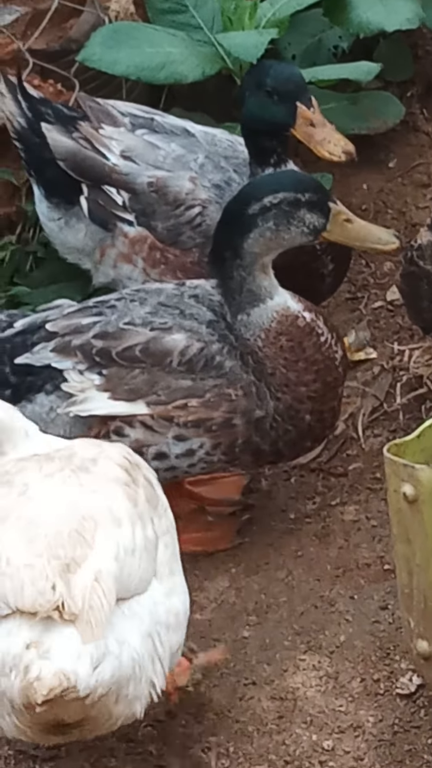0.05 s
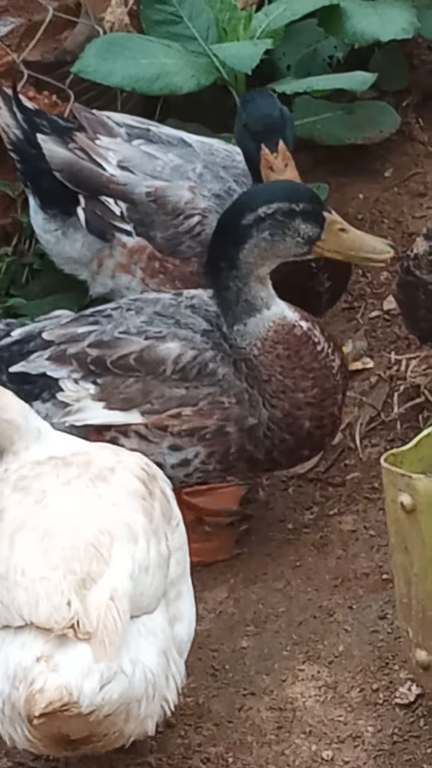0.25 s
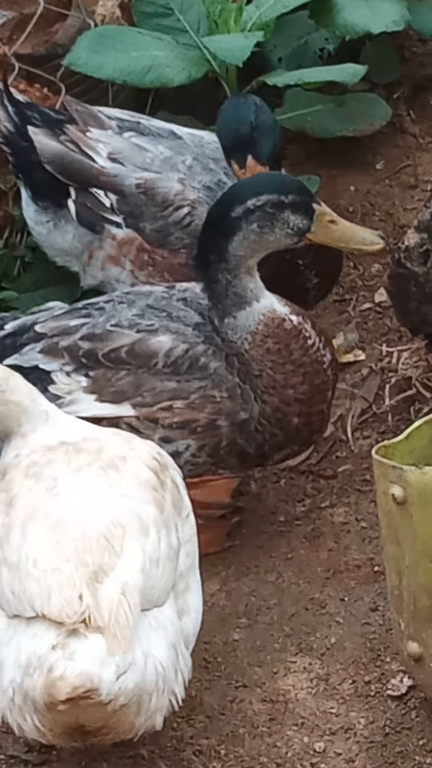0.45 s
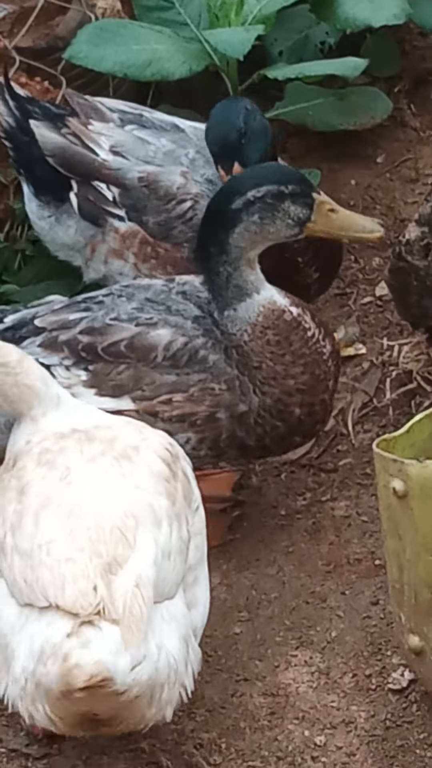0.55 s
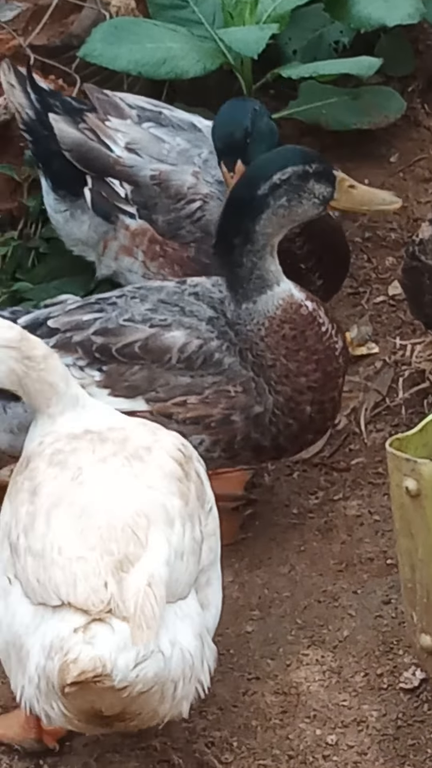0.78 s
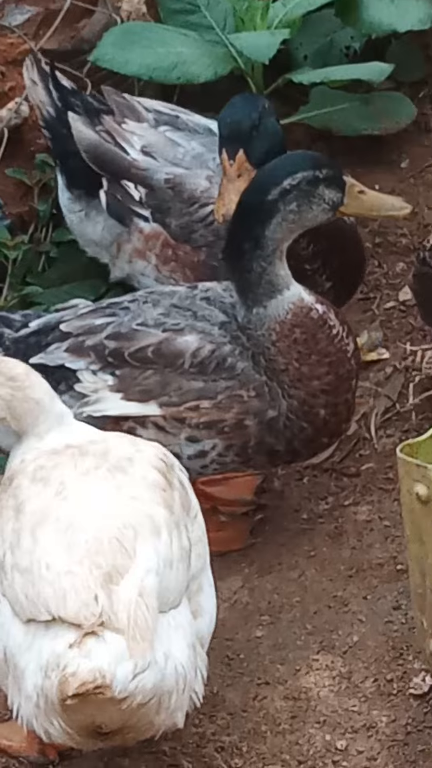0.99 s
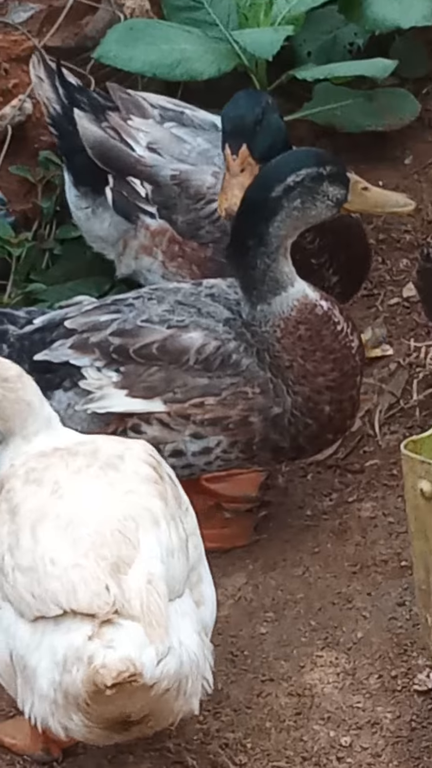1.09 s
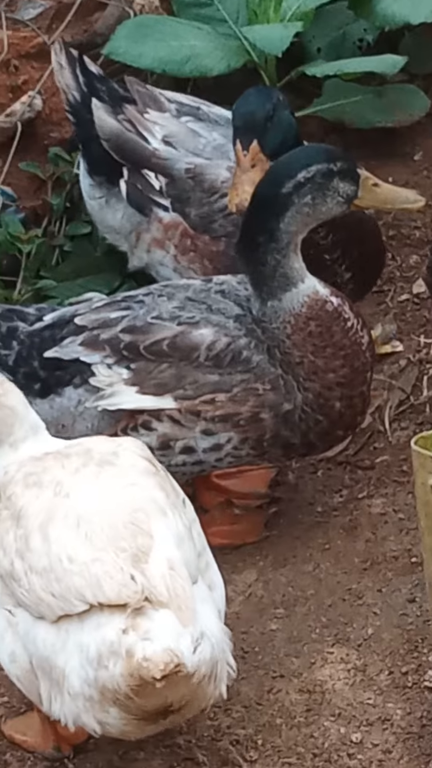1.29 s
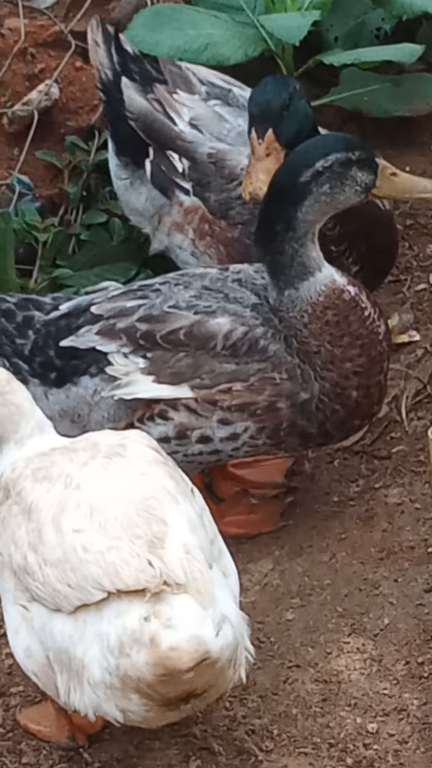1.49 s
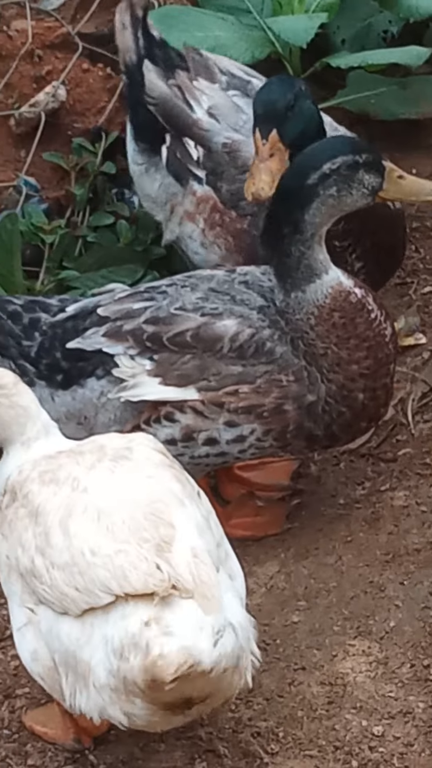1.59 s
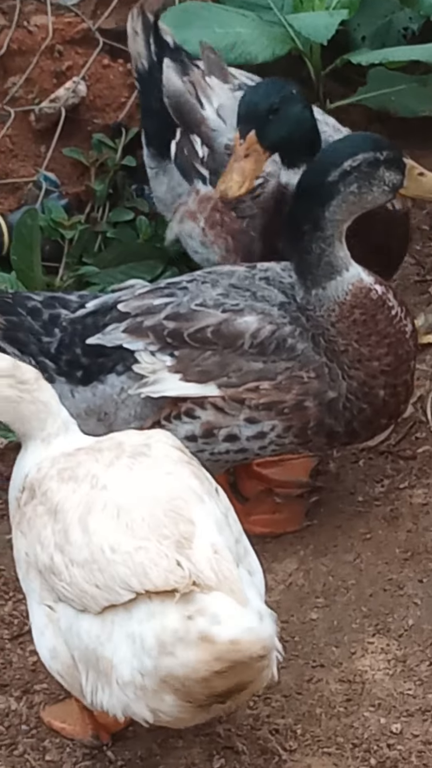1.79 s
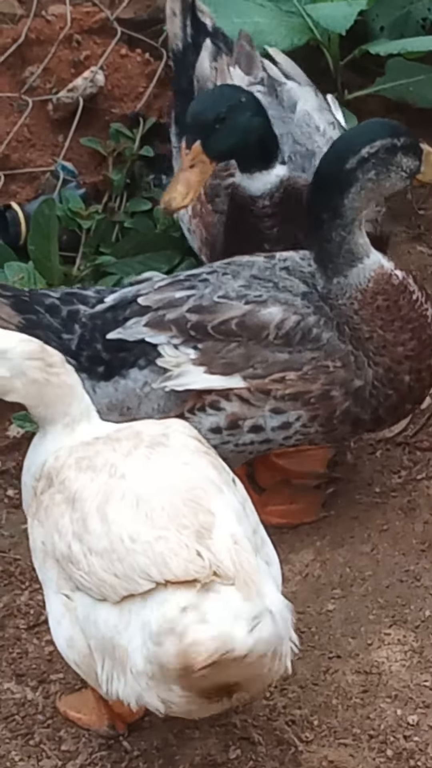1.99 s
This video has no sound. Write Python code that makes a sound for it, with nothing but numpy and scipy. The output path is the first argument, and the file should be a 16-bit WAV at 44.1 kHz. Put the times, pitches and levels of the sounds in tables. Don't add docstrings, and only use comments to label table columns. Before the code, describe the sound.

Several ducks give about ten short, raspy quacks in turn, differing in pitch and loudness, over soft foot taps on soil, faint cricket trills, outdoor hiss and a distant engine hum, picked up close by a phone.

```python
import sys
import numpy as np
from scipy import signal
from scipy.fft import rfft, irfft, next_fast_len
from scipy.io import wavfile
from scipy.ndimage import uniform_filter1d, map_coordinates

SR = 44100
rng = np.random.default_rng(int(sys.argv[2]) if len(sys.argv) > 2 else 0)


def gain_from_decibels(decibels):
    exponent = np.asarray(decibels, float) / 20
    return 10 ** exponent


def store_wav(level_fs):
    pcm = np.round(np.clip(np.atleast_2d(level_fs), -1, 1) * 32767)
    wavfile.write(sys.argv[1], SR, pcm.T.astype(np.int16))


N = 90404


def unit(x):
    return x / np.sqrt(np.mean(x ** 2) + 1e-20)


def along(points, hz):
    f, value = np.transpose(points)
    return np.interp(np.log(hz + 1), np.log(f + 1), value)


def wobble(rate_hz):
    knots = rng.standard_normal(int(N * 40 / SR) + 9)
    return map_coordinates(knots, [np.arange(N) * min(rate_hz, 39) / SR])


def filtered(x, response):
    size = next_fast_len(len(x) + 8192)
    return irfft(rfft(x, size) * response(np.fft.rfftfreq(size, 1 / SR)), size)[:len(x)]


def resonance(f, hz, width_hz):
    damping = 1j * f * width_hz
    return damping / (hz * hz - f * f + damping + 1e-9)


def resonant_noise(hz, width_hz):
    return unit(filtered(rng.standard_normal(N), lambda f: resonance(f, hz, width_hz) ** 2))


def add(out, start_s, x):
    i = round(start_s * SR)
    x = x[max(-i, 0):N - i]
    out[max(i, 0):][:len(x)] += x


def hiss(spectrum, patchy_db):
    z = signal.stft(rng.standard_normal(N), nperseg=512)[2]
    field = uniform_filter1d(rng.standard_normal(z.shape), 6, 0)
    field = uniform_filter1d(field, 10, 1)
    patches = gain_from_decibels(2 * patchy_db * np.tanh(unit(field) / 2))
    x = signal.istft(z * patches, nperseg=512)[1][:N]
    return unit(filtered(x, lambda hz: gain_from_decibels(along(spectrum, hz))))


# (frequency [Hz], density [dB per Hz])
AIR_SPECTRUM = [(20, -21), (55, 0.5), (200, -6), (500, -13.5), (1400, -3.5), (3500, -12.5), (7000, -18.5),
                (10200, -46)]
# (frequency [Hz], density [dB per Hz])
MICROPHONE_SPECTRUM = [(5590, -28), (9500, -6), (10500, -6.5), (12300, -11.5), (13500, -14.5), (14800, 3.5),
                       (15800, -0.5)]
# (time [s], level [dB])
AIR_LEVEL_CURVE = [(0, -62), (.15, -63), (0.699, -62), (1.3, -64.5), (1.75, -62.5), (1.85, -66),
                   (2.05, -62)]


def air():
    time_s, level_db = np.transpose(AIR_LEVEL_CURVE)
    outdoors = gain_from_decibels(np.interp(np.arange(N) / SR, time_s, level_db)) * hiss(AIR_SPECTRUM, patchy_db=1.9)
    return outdoors + gain_from_decibels(-85.5) * hiss(MICROPHONE_SPECTRUM, patchy_db=1.0)


# (frequency [Hz], width [Hz], level [dB])
INSECT_BANDS = [(4126, 470, -73), (7420, 400, -83)]


def far_insects():
    out = np.zeros(N)
    for hz, width_hz, level_db in INSECT_BANDS:
        out += gain_from_decibels(level_db + 1.1 * wobble(13)) * resonant_noise(hz, width_hz)
    return out


# (frequency [Hz], level [dB])
ENGINE_ENVELOPE = [(25, -35), (110, -23), (250, -10), (600, 5), (1000, 10.5), (1400, -6.5), (2200, 3),
                   (3400, -21.5)]
# (order [multiple of firing rate], level [dB rms])
STRONG_ORDERS = [(2, -78), (5, -66), (6, -72), (14, -83.5), (16, -75), (23, -84.5), (28, -71.5), (35, -83),
                 (39, -77.5), (43, -80.5), (51, -78.5), (52, -72.5), (53, -71.5), (55, -80.5)]


def engine():
    firing_hz, delay_s = 25.77, 0.011
    comb_db, scatter_db, wander_db = -70, 5, 2.95
    order = np.arange(1, 131)
    scatter, phase = rng.standard_normal((2, len(order)))
    level_db = along(ENGINE_ENVELOPE, order * firing_hz)
    total_db = 10 * np.log10(np.sum(gain_from_decibels(2 * level_db)))
    level_db = level_db + comb_db - total_db + scatter_db * scatter
    for k, strong_db in STRONG_ORDERS:
        level_db[round(k) - 1] = strong_db
    cycle = 2 * np.pi * firing_hz * (np.arange(N) / SR - delay_s)
    drift_db = [wander_db * wobble(5.19) for _ in range(5)]
    out = np.zeros(N)
    for k, db, turn in zip(order, level_db, phase):
        out += np.sqrt(2) * gain_from_decibels(db + drift_db[k % 5]) * np.sin(k * cycle + 1.16 * turn)
    return out


# (start [s], length [s], level [dB])
CRICKET_TRILLS = [
    (.009, .32, -67),
    (0.722, .28, -65.5),
    (1.388, .4, -69.5),
]


def cricket():
    wing_hz, width_hz, stroke_hz, sharpness = 8708, 280, 25.1, 1.2
    tone_share = 0.38
    gate = np.full(N, gain_from_decibels(-84.5))
    t = np.arange(SR // 2) / SR
    strokes = np.abs(np.sin(np.pi * stroke_hz * t)) ** (2 * sharpness)
    for start_s, length_s, level_db in CRICKET_TRILLS:
        whole_strokes = t < round(length_s * stroke_hz) / stroke_hz
        phrase_db = level_db - 15 * np.exp(-t / 0.033) - 5 * (t / length_s) ** 6
        add(gate, start_s, gain_from_decibels(phrase_db) * strokes * whole_strokes)
    scrape = resonant_noise(wing_hz, width_hz)
    tone = np.sqrt(2) * np.sin(2 * np.pi * wing_hz * np.arange(N) / SR)
    return gate * unit(scrape + tone_share * tone)


def yard(x):
    t60_s, first_echo_s = 0.14, .004
    t = np.arange(SR // 4) / SR
    tail = rng.standard_normal(len(t)) * gain_from_decibels(-60 * t / t60_s) * (t > first_echo_s)
    return signal.fftconvolve(x, tail / np.linalg.norm(tail))[:N]


# (start [s], level [dB], center [Hz], width [Hz], length [s])
FOOT_AND_BILL_TAPS = [
    (.005, -62.5, 2000, 170, 0.011),
    (.14, -64.5, 247, 110, .04),
    (0.12, -65, 570, 310, 0.042),
    (.245, -54.5, 880, 93, .018),
    (.735, -69, 221, 91, 0.033),
    (1.31, -61, 314, 440, 0.042),
    (1.308, -61, 2200, 1800, 0.0044),
    (.19, -67, 330, 170, 0.018),
    (1.308, -80.5, 16000, 2500, .025),
    (1.95, -84, 14500, 2600, .015),
]


def steps():
    out, t = np.zeros(N), np.arange(SR // 8) / SR
    for start_s, level_db, hz, width_hz, length_s in FOOT_AND_BILL_TAPS:
        burst = rng.standard_normal(len(t)) * (t / length_s) * np.exp(-4 * t / length_s)
        burst = filtered(burst, lambda f: resonance(f, hz, width_hz) ** 2)
        add(out, start_s, gain_from_decibels(level_db) * burst / np.sqrt(np.sum(burst ** 2) / (length_s * SR)))
    return out


def swell(t, length_s):
    attack_share, release_share, roundness = 0.43, 0.78, 1.97
    top_s = attack_share * length_s
    turn = np.where(t < top_s, t / top_s, 1 + (t - top_s) / (release_share * length_s))
    return np.abs(np.sin(np.pi / 2 * np.clip(turn, 0, 2))) ** roundness


def syrinx(t, rate_hz):
    jitter_share, scatter_db, sharpness, snap = .05, 2.5, 2.2, 12
    jitter, size = rng.standard_normal((2, 30))
    count = np.arange(len(size))
    flap_s = (count + np.clip(jitter_share * jitter, -.4, .4) - 1) / rate_hz
    cycle = np.interp(t, flap_s, count)
    puffs = np.abs(np.sin(np.pi * cycle)) ** (2 * sharpness)
    puffs = puffs * gain_from_decibels(scatter_db * size[cycle.astype(int)])
    middle = np.floor(cycle + .5)
    return puffs, snap * np.diff(middle, prepend=middle[0])


def duck(quacks, throat, rate_hz):
    main_width_hz, bright_from_hz, bill_top_hz = 94, 3500, 7560
    out, t = np.zeros(N), np.arange(SR // 5) / SR
    for start_s, length_s, level_db, main_hz, bright_db in quacks:
        puffs, snaps = syrinx(t, rate_hz)
        breath, call = rng.standard_normal(len(t)), np.zeros(len(t))
        for hz, width_hz, gain_db, lead_s in [(main_hz, main_width_hz, 0, 0)] + throat:
            opening = swell(t + lead_s, length_s)
            if hz > bright_from_hz:
                drive = breath * (puffs + .6) * opening ** 2.2
                gain_db = gain_db + bright_db
            else:
                drive = (breath + snaps) * (puffs + .17) * opening
            call += gain_from_decibels(gain_db) * filtered(drive, lambda f: resonance(f, hz, 1.5 * width_hz) ** 2)
        call = filtered(call, lambda f: 1 / np.sqrt(1 + (f / bill_top_hz) ** 16))
        add(out, start_s, gain_from_decibels(level_db) * call / np.sqrt(np.sum(call ** 2) / (length_s * SR)))
    return out


# (start [s], length [s], level [dB], main resonance [Hz], brightness [dB])
FAR_QUACKS = [
    (.184, 0.065, -47, 2280, 2),
    (1.067, 0.081, -48.5, 2223, -2),
]
# (frequency [Hz], width [Hz], level [dB], lead [s])
FAR_RESONANCES = [(1607, 100, -10.5, 0.0005), (1870, 110, -10, 0.016), (2900, 110, -17.5, 0.0074),
                  (5050, 66, -18, -0.00036), (5610, 130, -11, 0.012), (6030, 89, -12, 0.01)]


def far_drake():
    return duck(FAR_QUACKS, FAR_RESONANCES, rate_hz=82.4)


# (start [s], length [s], level [dB], main resonance [Hz], brightness [dB])
HOARSE_QUACKS = [
    (.478, 0.072, -52, 2263, -2),
    (1.346, 0.06, -48, 2206, -5.5),
]
# (frequency [Hz], width [Hz], level [dB], lead [s])
HOARSE_RESONANCES = [(1370, 53, -6.5, -0.015), (1667, 77, -5.5, -0.00092), (1930, 27, -6, 0.012),
                     (2813, 130, -8, 0.0092), (4490, 210, -17, 0.0079), (5260, 130, -9, -0.001),
                     (5700, 130, -10.5, -.003), (5910, 150, -5, 0.0062)]


def hoarse_duck():
    return duck(HOARSE_QUACKS, HOARSE_RESONANCES, rate_hz=89.4)


# (start [s], length [s], level [dB], main resonance [Hz], brightness [dB])
HIGH_QUACKS = [
    (.296, 0.08, -45.5, 2284, 1),
    (.549, 0.075, -44, 2290, -0.5),
]
# (frequency [Hz], width [Hz], level [dB], lead [s])
HIGH_RESONANCES = [(1393, 85, -12.5, 0.028), (1670, 110, -12.5, -0.017), (1866, 72, -7, -0.0054),
                   (2760, 88, -29.5, -0.034), (3850, 61, -19.5, -0.007), (4540, 64, -23.5, 0.0056),
                   (5280, 75, -25, 0.0071), (6040, 150, -19.5, -0.0008)]


def high_drake():
    return duck(HIGH_QUACKS, HIGH_RESONANCES, rate_hz=95)


# (start [s], length [s], level [dB], main resonance [Hz], brightness [dB])
LOW_QUACKS = [
    (.703, 0.089, -44, 1742, -2),
    (.927, 0.097, -40, 1756, -0.5),
    (1.466, 0.079, -44.5, 1890, -6.5),
]
# (frequency [Hz], width [Hz], level [dB], lead [s])
LOW_RESONANCES = [(1447, 50, -15.5, 0.0025), (2230, 53, -7.5, 0.0039), (2859, 100, -15, 0.00077),
                  (3230, 110, -25, -0.0045), (3832, 70, -15.5, -.006), (4490, 128, -13, -0.00084),
                  (5210, 260, -12, -.004), (5492, 120, -6.5, -.002), (6220, 86, -21, -0.0015)]


def low_drake():
    return duck(LOW_QUACKS, LOW_RESONANCES, rate_hz=91)


# (start [s], length [s], level [dB], main resonance [Hz], brightness [dB])
NEAR_QUACKS = [
    (1.689, 0.087, -40.5, 1850, -0.5),
]
# (frequency [Hz], width [Hz], level [dB], lead [s])
NEAR_RESONANCES = [(1500, 91, -21, -0.026), (2280, 220, -7, -0.0073), (2924, 76, -4, 0.0018),
                   (3250, 31, -16, -0.0015), (3934, 45, -8, -0.0012), (4615, 170, -11.5, -0.0054),
                   (5210, 94, -8, -0.013), (5700, 250, -13.5, -0.0092), (6280, 61, -26, 0.019)]


def near_drake():
    return duck(NEAR_QUACKS, NEAR_RESONANCES, rate_hz=88.9)


def scene():
    ducks = high_drake() + low_drake() + hoarse_duck() + near_drake() + far_drake()
    near = ducks + steps()
    echoes = gain_from_decibels(-15) * yard(near)
    return (near + echoes + engine() + air() + cricket() + far_insects())[None]


def low_pass(x):
    return signal.sosfilt(signal.butter(12, 15920, fs=SR, output="sos"), x)


def record(dry):
    mix = filtered(dry[0], lambda hz: hz < 15750)[None]
    return low_pass(mix)


dry = scene()
out = record(dry)
store_wav(out)
```